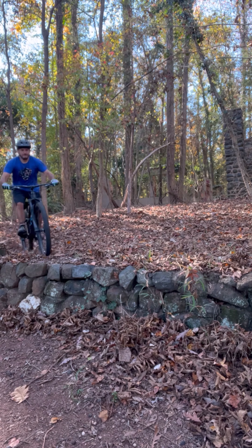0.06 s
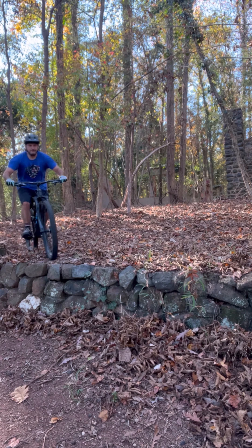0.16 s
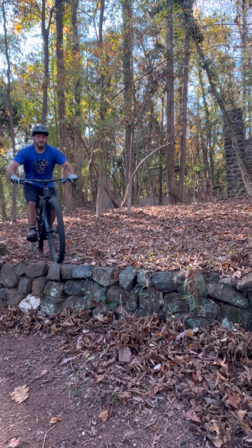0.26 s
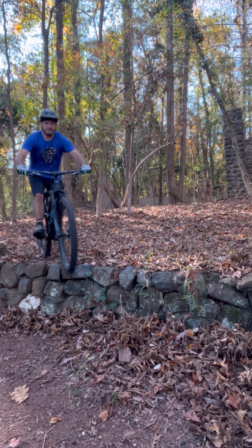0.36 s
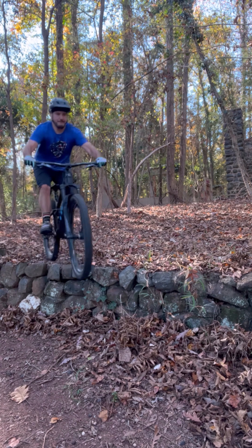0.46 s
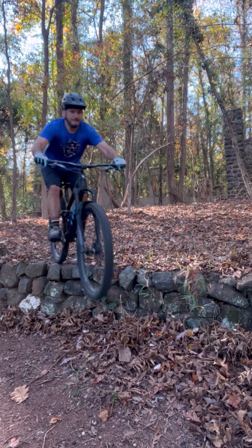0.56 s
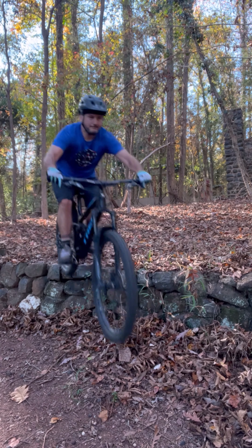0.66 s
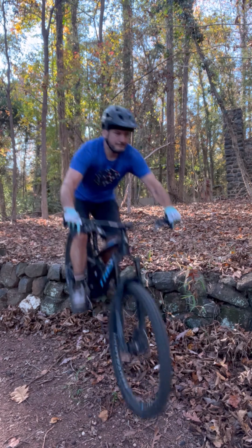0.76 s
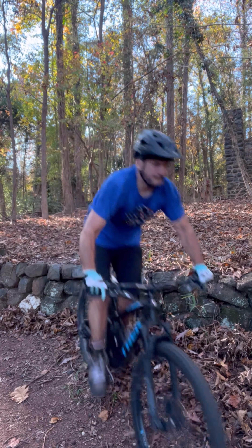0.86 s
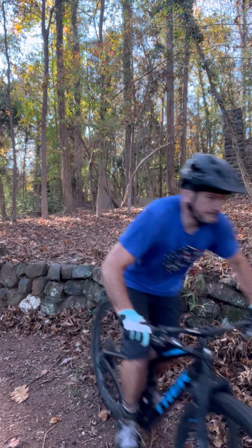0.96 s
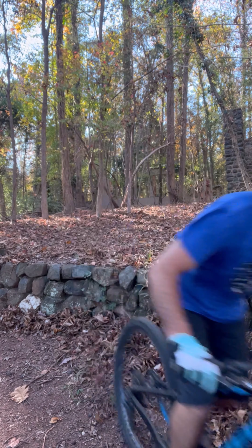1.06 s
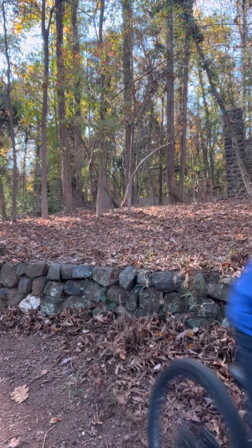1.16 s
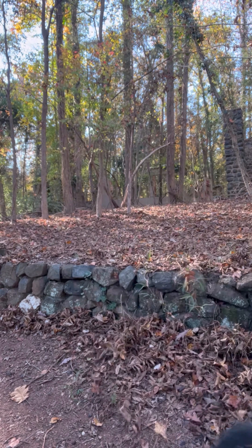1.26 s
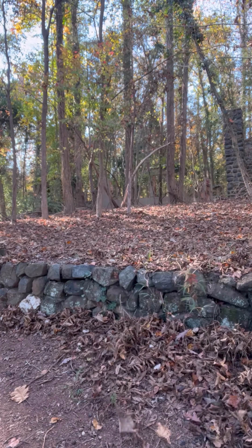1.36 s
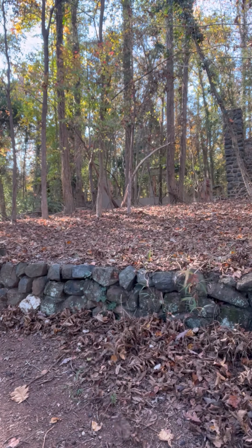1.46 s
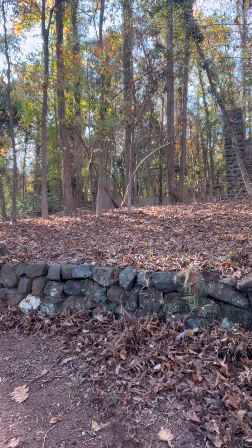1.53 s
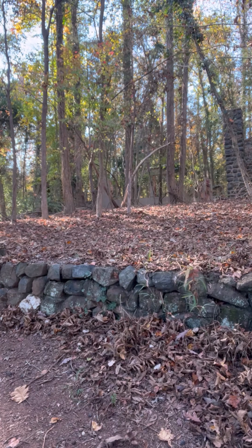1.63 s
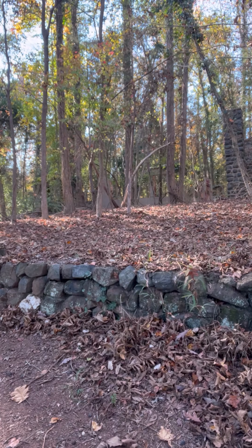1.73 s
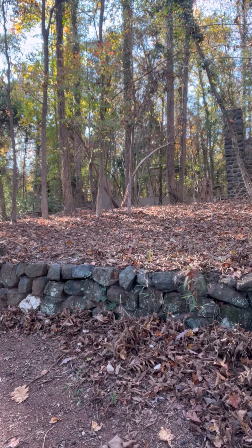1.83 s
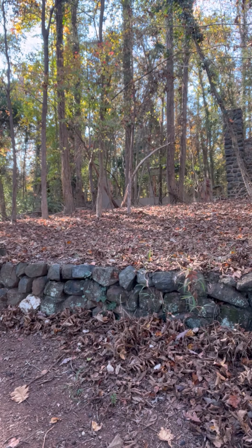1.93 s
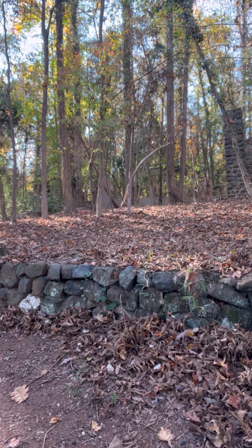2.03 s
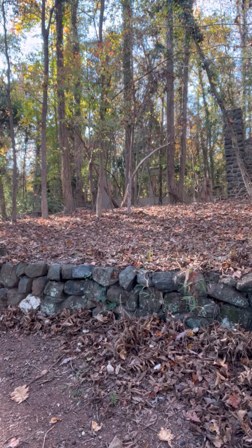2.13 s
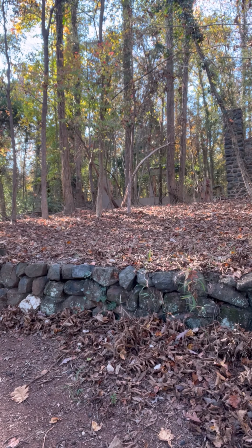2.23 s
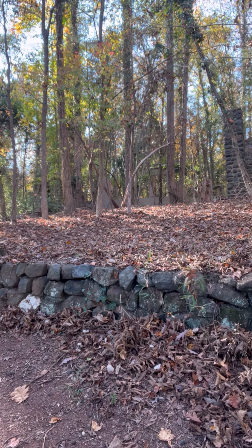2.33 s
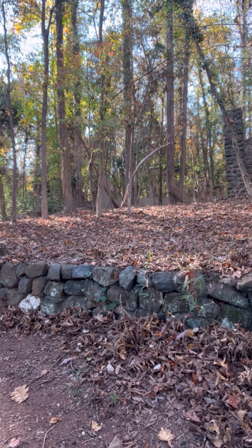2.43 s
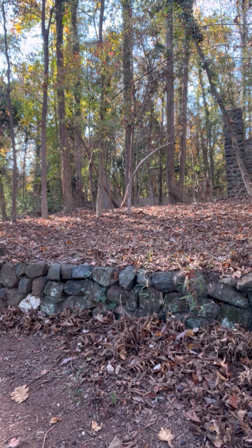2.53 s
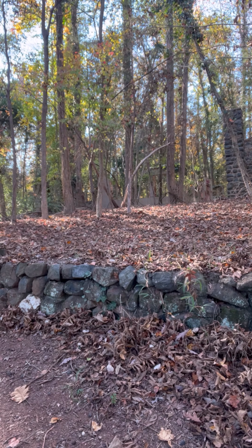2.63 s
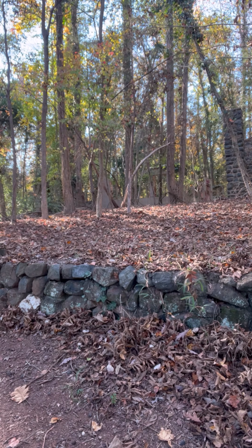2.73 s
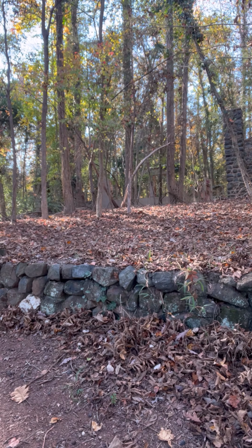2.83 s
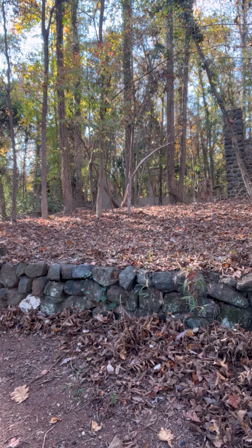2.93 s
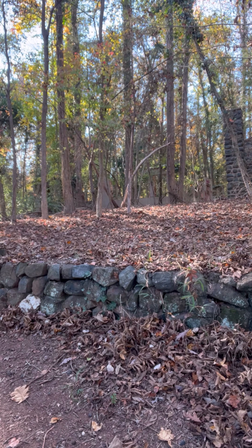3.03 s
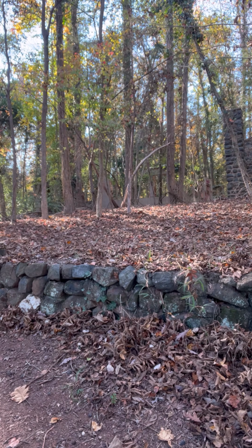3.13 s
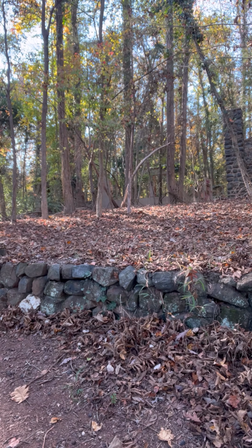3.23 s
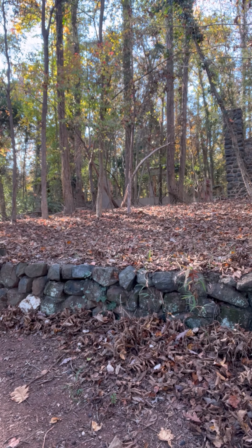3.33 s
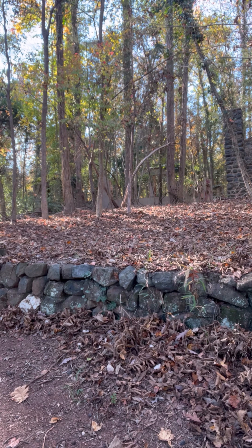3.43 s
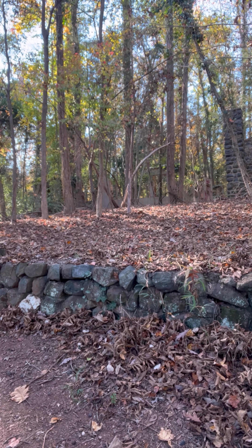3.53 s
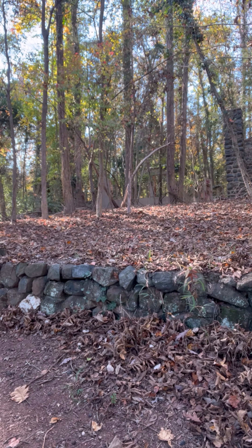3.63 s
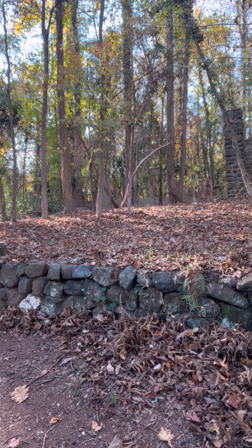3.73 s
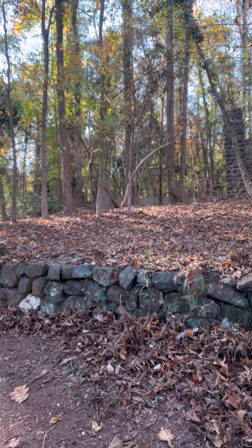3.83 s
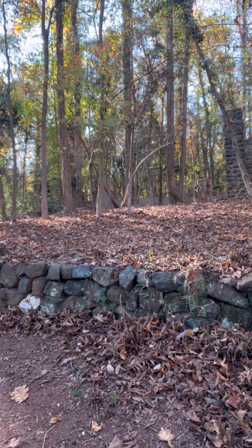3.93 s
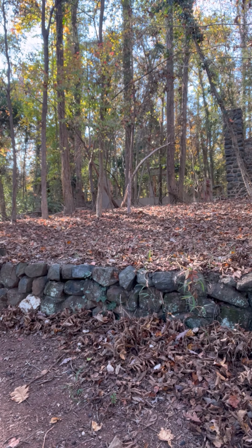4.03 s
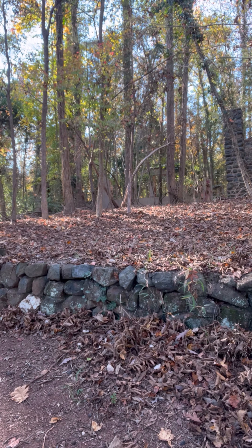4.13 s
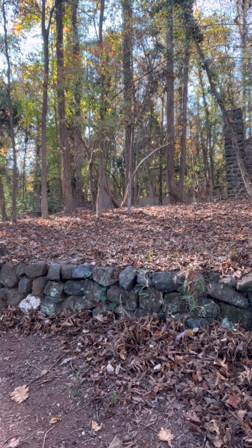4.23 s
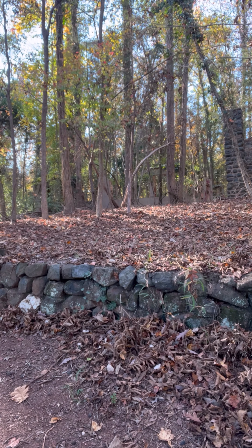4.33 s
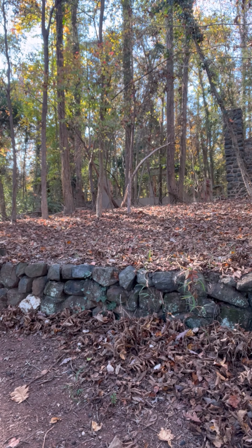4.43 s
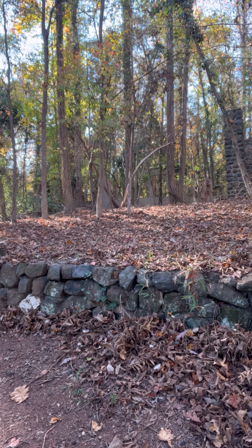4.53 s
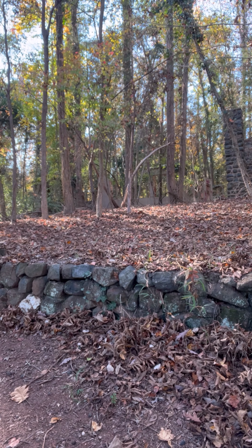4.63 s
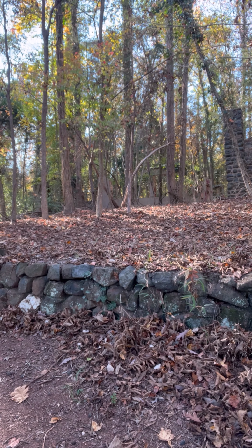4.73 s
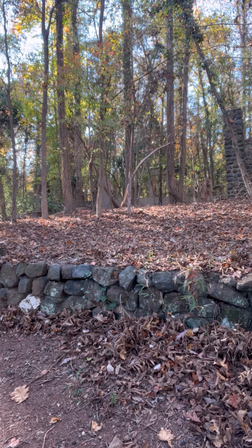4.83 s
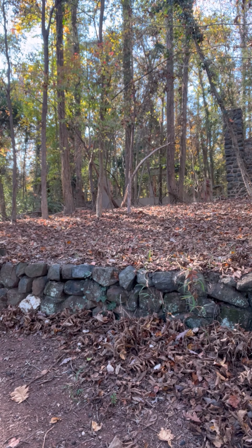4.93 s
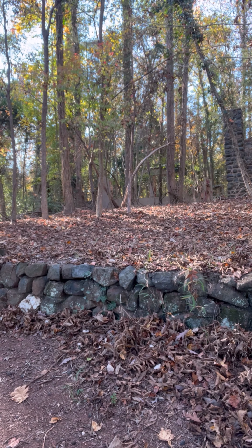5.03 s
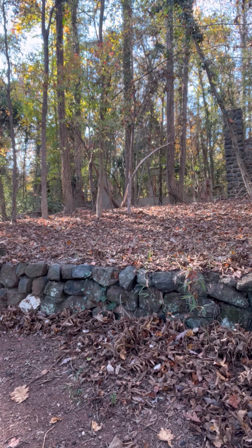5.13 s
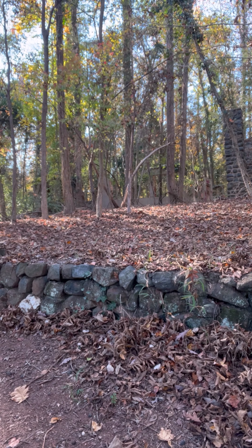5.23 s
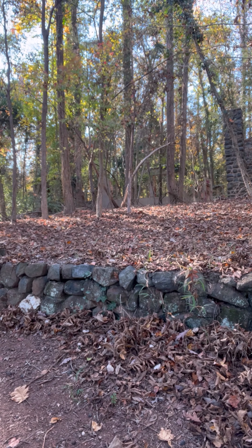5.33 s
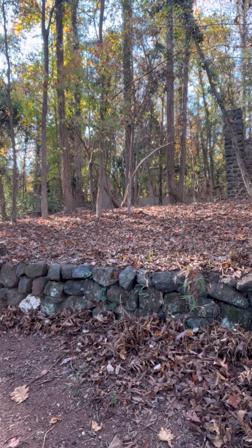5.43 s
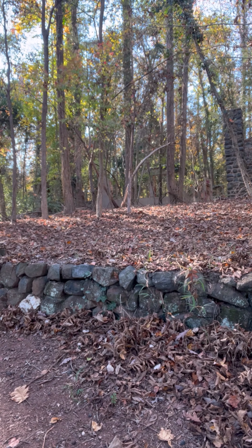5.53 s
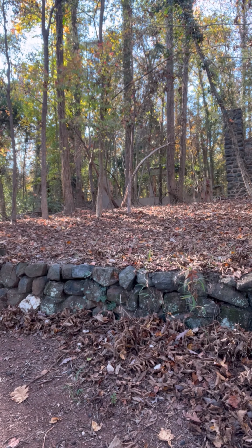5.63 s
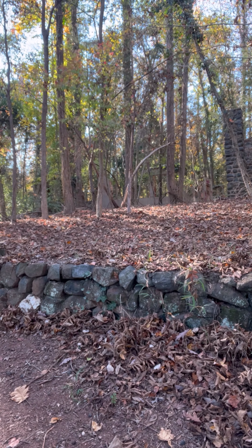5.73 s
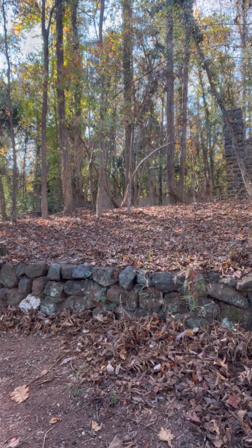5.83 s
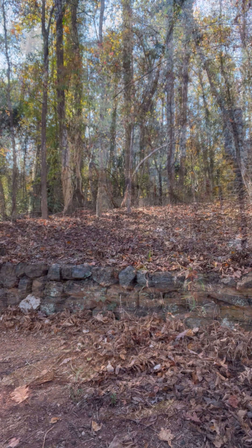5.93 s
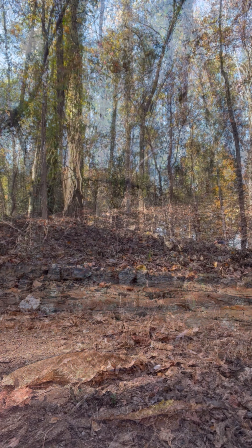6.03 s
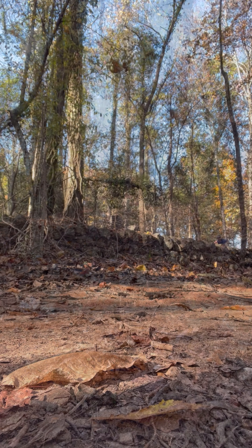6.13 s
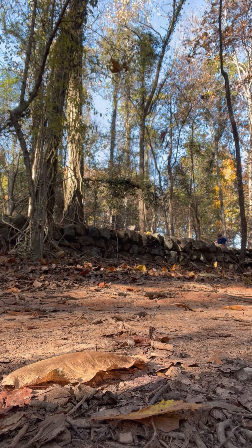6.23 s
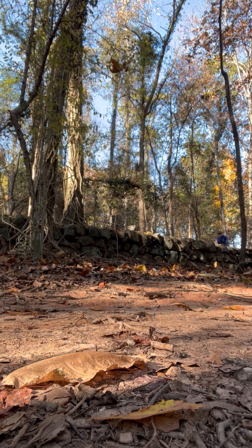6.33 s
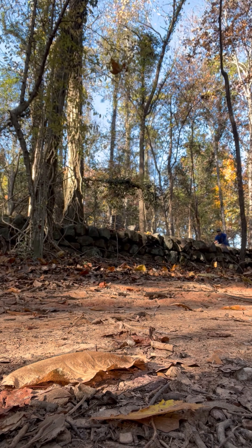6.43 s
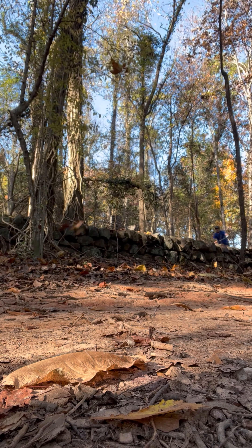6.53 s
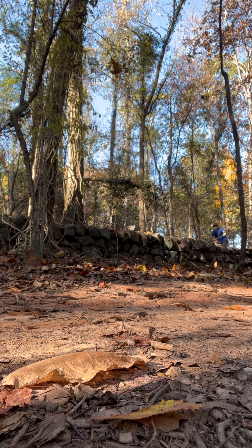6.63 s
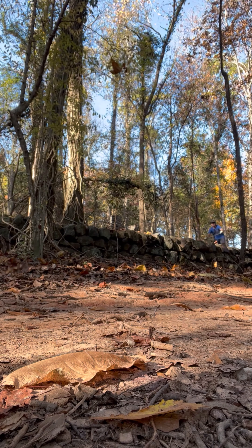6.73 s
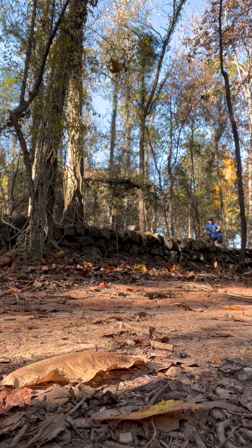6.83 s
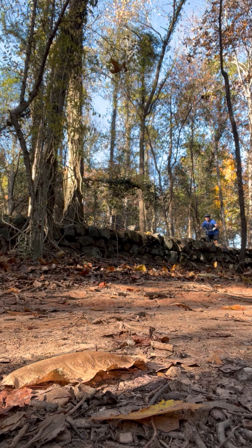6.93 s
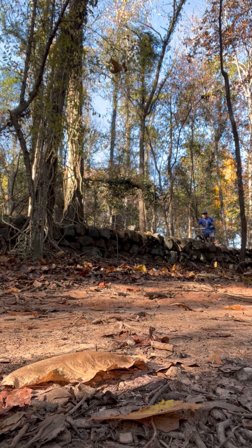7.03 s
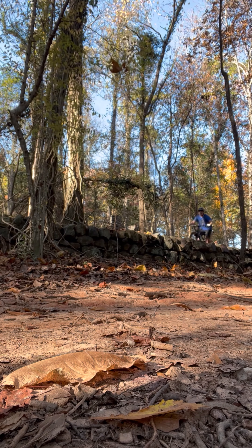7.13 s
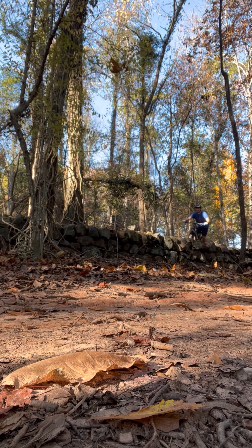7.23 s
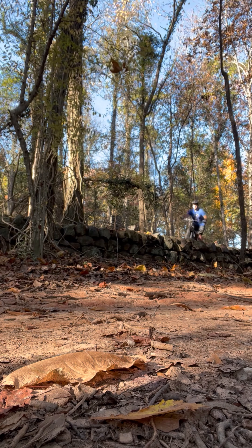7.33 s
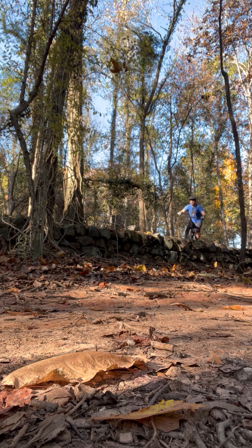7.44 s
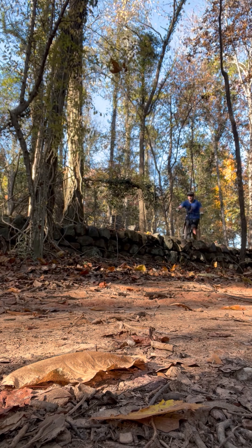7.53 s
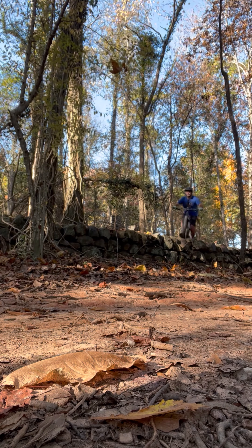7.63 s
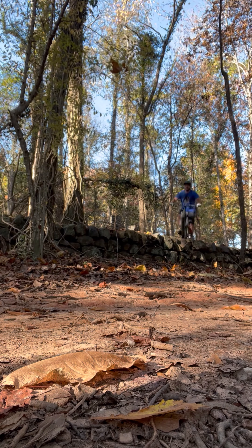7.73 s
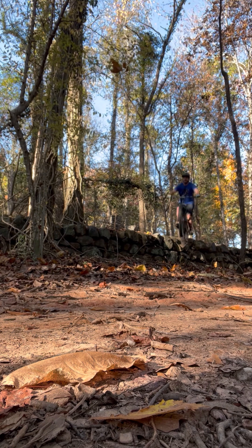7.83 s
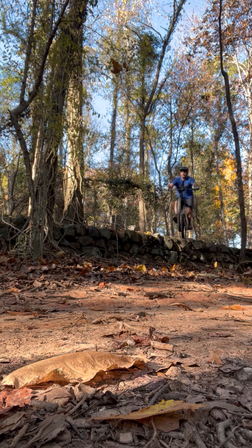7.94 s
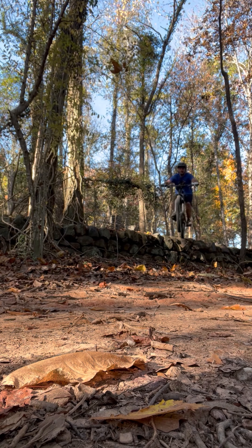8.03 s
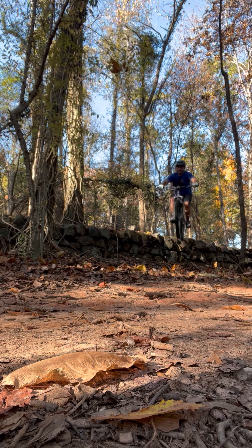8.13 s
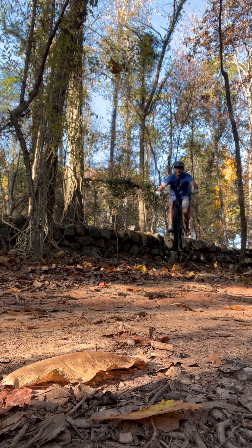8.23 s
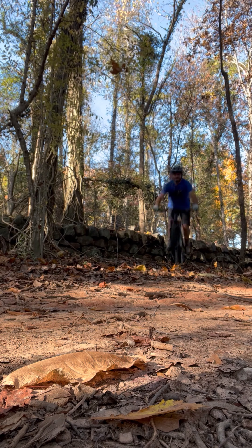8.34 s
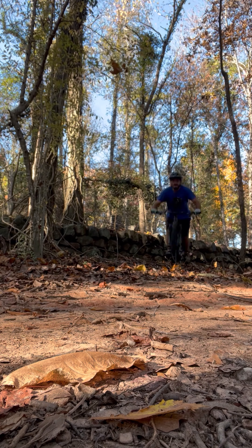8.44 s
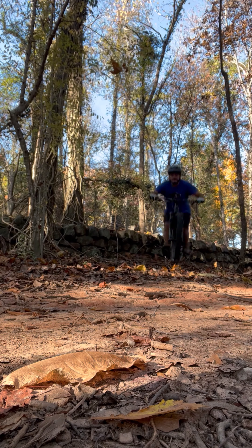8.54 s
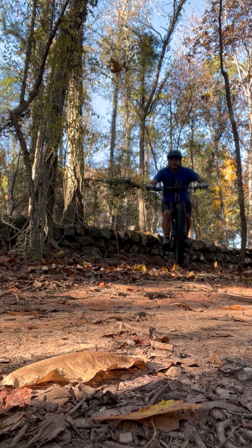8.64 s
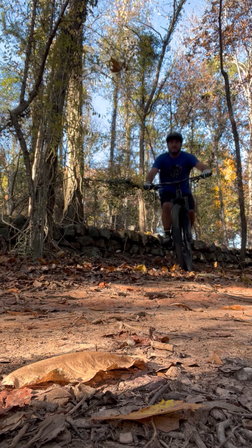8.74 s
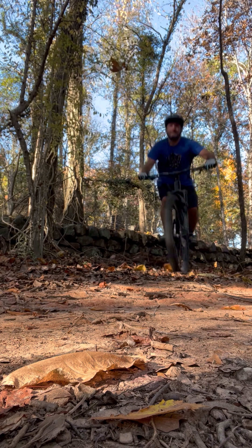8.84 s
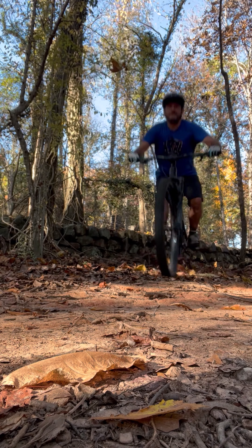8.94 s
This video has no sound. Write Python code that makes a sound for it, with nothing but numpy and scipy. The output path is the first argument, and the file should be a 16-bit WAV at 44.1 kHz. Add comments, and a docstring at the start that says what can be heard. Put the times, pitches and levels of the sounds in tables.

```python
"""In the woods, a mountain bike rolls over a leafy stone ledge, drops off it, lands close by and rides away.
A distant rumble swells, with an engine droning and birds peeping. The program then changes to a quieter spot,
where the bike comes from far off, bumps over the ground, lands and crunches towards a low pair of microphone openings.
Leaves, grit and tread are trains of tiny random clicks shaped in tone; thumps, knocks, rattles and peeps are
short sine waves, some with noise; the backgrounds are smooth coloured noise."""
import sys
import numpy as np
from scipy import signal
from scipy.fft import rfft, irfft, next_fast_len
from scipy.io import wavfile

SR = 44100
rng = np.random.default_rng(int(sys.argv[2]) if len(sys.argv) > 2 else 0)


def digitize_waveform(pressure):
    """Quantize a signal to 16-bit integers and store it at the path in sys.argv[1].

    Rows of a 2-D input are taken as channels; values are limited to [-1, 1].
    """
    field = np.atleast_2d(pressure).T
    bounded = np.clip(field, -1, 1)
    quanta = np.round(bounded * 32767).astype(np.int16)
    wavfile.write(sys.argv[1], SR, quanta)


N = 395577
T = np.arange(N) / SR  # time of every sample, seconds

# Tone colours, as relative level against pitch. Columns of each: pitch_hz, level_db (per Hz)
# dry leaves at the first spot and at the second
NEAR_LEAF_TONE = [(1200, -36.5), (3200, -2.5), (4200, -0.5), (5200, -4), (6500, 2), (8000, 1),
                  (10000, -3.5), (12000, -13.5), (14000, -10.5), (15700, -10.5)]
LOW_LEAF_TONE = [(900, -49), (2600, -2), (4000, -1), (5500, -0.5), (7500, 1.5), (10000, -2.5), (12000, -10),
                 (14000, -11.5), (15700, -7)]
# heaps of leaves and twigs being crushed
CRUSH_TONE = [(90, -44), (300, -3), (600, -2.5), (1000, -1), (1900, 0.5), (3000, -4), (4200, -5.5),
              (6000, -9), (9000, -9), (12000, -15.5), (15500, -19)]
# grit on the ledge, on the path ahead, on the path beside the microphone, and on packed dirt
LEDGE_GRIT_TONE = [(150, -25.5), (400, -4.5), (800, -8), (1300, -3), (1900, 0), (2500, -10), (3500, -18.5)]
PATH_GRIT_TONE = [(120, 3.5), (270, 1.5), (520, -0.5), (850, -7), (1300, -5.5), (2000, -0.5), (3200, -15)]
PATH_ASIDE_GRIT_TONE = [(120, 4), (270, 1.5), (420, 3), (600, 3), (850, -0.5), (1250, -6), (1650, -11),
                        (2000, -4), (3200, -14.5)]
DIRT_GRIT_TONE = [(200, -11), (450, 2), (700, -6), (1000, -2), (1500, -3), (2200, -9), (3500, -22)]
# tread knobs, the drumming frame, and the far bike on rough ground
KNOB_TONE = [(1500, -24), (1900, -9), (2250, -1.5), (2620, 0), (2850, -2.5), (3100, -22), (3400, -44)]
FRAME_TONE = [(80, -44), (140, -14), (190, 2), (260, -3), (350, -6), (700, -11), (1500, -33)]
ROUGH_GROUND_TONE = [(40, 0), (65, 2), (110, -5), (200, -4), (350, -25), (600, -34)]
# distant rumble, low air, foliage, the hush of the second spot, and the far engine
RUMBLE_TONE = [(60, -29.5), (100, -8), (125, -11.5), (150, 0), (175, -6), (205, -0.5), (250, -9.5),
               (330, -8), (500, -9), (750, -11.5), (1100, -16), (1500, -22.5), (2000, -22), (2400, -32.5),
               (3000, -40.5), (6000, -60.5)]
AIR_TONE = [(20, -25), (35, -10), (50, -6), (65, 3.5), (90, -8.5), (130, -19), (300, -39)]
FOLIAGE_TONE = [(1500, -4.5), (3000, 2.5), (5000, -3), (6500, 0), (9000, -7), (15000, -20)]
WOODS_TONE = [(25, -6), (55, 4.5), (90, 3), (135, -6.5), (220, -3.5), (400, -8), (700, -10.5), (1200, -15),
              (2200, -11), (4000, -13.5), (9000, -16.5), (14000, -29.5)]
ENGINE_TONE = [(108, -30.5), (128, 1.5), (143, -2.5), (160, -5), (185, -24.5)]

# How sound reaches the two microphone openings.
# Columns of each: pitch_hz, left_lead_radians, likeness (0 to 1), left_minus_right_db
# the first spot in general, close in front, beside, and the side the rumble comes from
UPRIGHT_MIC = [(20, -0.5, 0.89, 1.5), (150, 0.5, 1, -0.5), (590, -.5, 0.087, 3.5), (1280, -0.1, 0.47, 4.5),
               (2430, -2.5, 0.79, 4.5), (3260, 1.5, 0.24, 0.5), (5030, -1.9, 0.33, 0), (7150, 2.1, .7, 0),
               (9270, 3, 0.98, 0), (12010, 5, 0.43, 0), (13280, 5.5, .92, 0.5), (14900, 8, 0.62, 0.5),
               (15800, 6.5, 0.38, -3.5)]
AHEAD_MIC = [(20, 0.5, 0.7, 1.5), (150, 0, .85, 0.5), (590, -0.5, 1, 0), (1300, -0.8, .72, 1),
             (1900, -1.5, 0.39, 7), (2700, -2.5, 0.63, 2.5), (3530, 1.7, .45, -1), (5000, -1.5, 0.97, -0.5),
             (7120, 1.9, 0.79, 0), (9200, 3, 0.9, -.5), (13400, 5.5, 0.96, 0), (15800, 5.5, .5, -2)]
ASIDE_MIC = [(20, -2.5, 0.98, 1), (250, 0.1, 0.86, 5), (420, -1.4, 0.29, 1), (600, -2.5, 0.8, -2.5),
             (1200, -2.5, 0.65, 1.5), (1600, -3, .25, 5), (2000, -2.5, 0.58, 0.5), (2700, -5, 1, 3.5),
             (3200, -4, 0.45, -4.5)]
RUMBLE_MIC = [(20, 0, 0.98, 0), (150, 0.15, 0.98, 0.5), (247, 0.38, .75, 0.5), (386, 1.87, 0.35, 1.5),
              (596, 3, 0.48, 3.5), (850, 3.5, 0.55, 4), (1200, 4, 0.39, 3), (1600, 5, 0.94, 5),
              (2000, 4.5, 0.64, 8), (2590, 3.5, 0.53, 3), (5000, 4.5, .3, 0)]
# the second spot, lying low
GROUNDED_MIC = [(20, 1.5, 1, 0), (300, 0.45, 0.77, 0), (800, 0.8, 0.73, 0), (1410, 1.22, 0.9, 0),
                (2550, 2.35, 0.1, 0), (4100, -1, 0.13, 0), (7830, -3.5, 0.82, 0), (10300, -5.5, 0.35, 0),
                (15900, -9, 0.99, 0)]

# Leaves under the far-off bike. Columns: time_s, level_db, treble_db (before a steady lift)
FAR_LEAF_LEVEL = [(6.5, -82, -6), (6.64, -61, -9), (7.5, -58, -4.5), (7.72, -65.5, -2), (7.84, -57, -3.5),
                  (8.1, -57.5, -6), (8.2, -63.5, 0.5), (8.4, -60, 2.5)]
# Levels of the distant rumble, the low air at the first spot, and the far engine. Columns: time_s, level_db
RUMBLE_LEVEL = [(0, -46.5), (2, -45), (3, -48), (3.6, -49.5), (4.25, -44), (4.6, -46), (5.1, -42.5),
                (5.5, -42), (6.25, -43.5)]
AIR_LEVEL = [(0, -47.5), (1.3, -44), (2.2, -45.5), (3.4, -48), (4.6, -48), (5.8, -48), (6.2, -43.5)]
ENGINE_LEVEL = [(0, -54), (2.4, -59), (4.6, -52.5), (5, -43), (5.6, -48), (6.2, -40.5), (6.35, -55.5),
                (7, -68.5), (8.9, -70)]
# Leaves and twigs crushed under a wheel. Columns: start_s, level_db, decay_s, treble_tilt_db (per octave)
CRUSHED_HEAPS = [(.622, -42, 0.023, 2), (.899, -27.5, 0.016, -1.5), (0.913, -27, 0.013, 3),
                 (.922, -24.5, 0.019, 3), (.934, -21, 0.018, 3.5), (0.944, -23, .005, 0),
                 (0.955, -27.5, 0.0094, -5), (.969, -22.5, 0.014, 3), (.979, -31.5, 0.0056, -3),
                 (.988, -22.5, 0.0089, 4), (.999, -25.5, 0.018, 0), (1.018, -25.5, 0.012, 2),
                 (1.03, -33, 0.012, 0), (1.101, -39, 0.019, -14), (1.142, -31, 0.018, -7),
                 (1.188, -30.5, 0.013, -6), (1.538, -33, 0.011, -6.5), (1.549, -30, 0.0063, -8),
                 (1.558, -29.5, 0.0056, -10), (1.64, -55, .015, -1), (1.787, -40, 0.015, -18),
                 (1.88, -50, 0.037, 1), (2.405, -48.5, 0.048, 2), (2.715, -51, 0.037, -1),
                 (2.744, -48, 0.033, 1), (2.77, -47.5, 0.036, -0.5), (6.71, -42, 0.036, 4),
                 (6.751, -52.5, 0.061, 3), (7.802, -48.5, 0.0097, -5), (7.823, -52, .006, -4),
                 (7.832, -48, 0.0071, -4), (7.872, -49.5, 0.0093, -14), (7.885, -55, 0.03, -3),
                 (8.407, -42, 0.0064, -7), (8.425, -39, 0.014, 4.5), (8.553, -36, 0.021, -15),
                 (8.601, -38, 0.016, 8), (8.625, -44.5, 0.02, -8), (8.655, -43, .006, -8),
                 (8.714, -43.5, 0.017, -10), (8.815, -34, 0.02, -7), (8.82, -28, 0.018, 14.5),
                 (8.873, -43, 0.0063, -5), (8.912, -30, 0.0058, -4), (8.919, -21, 0.0054, 12),
                 (8.948, -34, 0.033, 0.5)]
# Dull low thumps, mostly of tyres on the ground, some perhaps air buffeting or handling of the microphone.
# Columns: start_s, level_db, pitch_hz
DULL_THUMPS = [(.91, -23, 75), (0.944, -13.5, 56.3), (0.97, -27, 103), (0.998, -22, 189), (1.026, -24, 152),
               (1.058, -28, 175), (1.095, -31, 150), (1.189, -36, 66.5), (1.255, -29, 64),
               (1.424, -41, 235), (1.431, -33, 94), (1.545, -27, 270), (1.878, -24.5, 64), (2.36, -38, 72),
               (4.214, -29, 66), (7.125, -44, 115), (7.239, -33, 56.5), (7.258, -44.5, 200),
               (7.302, -38, 109), (7.304, -48, 214), (7.347, -37, 74), (7.369, -31.5, 69.46),
               (7.368, -39, 193), (7.399, -46, 252), (7.403, -40, 141), (7.484, -36, 63.6),
               (7.511, -34, 96), (7.567, -35, 115), (7.572, -46, 250), (7.669, -45, 90), (7.701, -36.5, 71),
               (7.703, -47, 254), (7.779, -39.5, 119), (8.315, -38.5, 87), (8.368, -32, 70.4),
               (8.412, -37, 220), (8.43, -30, 264), (8.44, -36, 62), (8.472, -31, 194), (8.533, -28.5, 184),
               (8.543, -30, 182), (8.556, -27, 246), (8.606, -34, 198), (8.629, -39, 210),
               (8.714, -35, 272), (8.757, -33, 111), (8.772, -39, 70), (8.845, -35, 136),
               (8.866, -31.5, 84.6)]
# Sharp knocks of the bike and of stones under its tyres. Columns: start_s, level_db, pitch_hz, decay_s
SHARP_KNOCKS = [(.272, -14, 1330, 0.00079), (0.899, -19, 1360, 0.003), (.906, -17, 335, 0.003),
                (.906, -19, 1040, 0.0023), (.915, -21, 5440, .003), (.9405, -14, 3200, 0.00036),
                (0.989, -20.5, 382, 0.0044), (1.018, -23, 920, 0.0042), (1.025, -19.5, 643, 0.0026),
                (1.031, -19, 1100, 0.00081), (1.074, -27.5, 1204, 0.0065), (1.115, -29, 1120, 0.016),
                (1.138, -28, 614, 0.0081), (1.19, -25.5, 1980, .009), (1.194, -23, 1330, 0.021),
                (1.241, -28, 525, 0.01), (1.531, -28, 497, .008), (1.549, -37, 1110, 0.0012),
                (1.558, -26, 414, 0.0032), (1.383, -28, 2634, 0.013), (1.779, -37.5, 896, 0.012),
                (1.79, -35, 690, 0.0069), (1.835, -38, 2610, .012), (2.675, -45, 2850, .008),
                (8.409, -34, 590, 0.0027), (8.558, -24, 495, 0.0034), (8.797, -34, 500, .004),
                (8.817, -28, 1024, 0.0065), (8.872, -32, 480, 0.0026), (8.826, -26.5, 530, 0.01),
                (8.894, -22.5, 415, 0.0027)]
# Metal parts that ring, before each jolt varies them. Columns: pitch_hz, level_db, fall_by_60_db_s
METAL_PARTS = [(1190, -5.5, .2), (1330, -5.5, 0.18), (1474, -7.5, .2), (1840, 2, 0.25), (1895, -4.5, 0.24),
               (2850, -10, 0.13), (3440, -12.5, 0.08), (3800, -10, .15), (5280, -4.5, .08),
               (5230, -1.5, 0.089), (5760, 1.5, 0.13), (6430, -2.5, 0.15), (7040, -6, 0.13)]
# Jolts that rattle the metal. Columns: start_s, level_db
RATTLE_JOLTS = [(.108, -45), (0.359, -44), (0.916, -29), (0.938, -32.5), (0.988, -36.5), (1.022, -33.5),
                (1.071, -37), (1.196, -42), (1.548, -52)]
# Faint bird peeps. Columns: start_s, peak_db, middle_pitch_hz, length_s, glide (share of the pitch)
BIRD_PEEPS = [(3.522, -61, 3550, 0.029, .12), (4.003, -70, 5620, 0.024, -.06),
              (4.055, -68, 5000, 0.038, -.02), (4.074, -62, 3220, 0.016, .14),
              (4.132, -65, 3980, .025, -.05), (4.697, -67, 3700, .024, .13)]
# Tread pitch over time, before a random waver. Columns: time_s, pitch_factor
TREAD_PITCH = [(1.06, 0.88), (1.2, 0.88), (1.27, 0.95), (1.4, 0.96), (1.5, 0.92), (1.64, 1.016),
               (2.4, 0.99), (3, 0.9), (3.8, 0.76)]
# Hollow note of the passing tyres. Columns: time_s, pitch_hz
HOLLOW_PITCH = [(1.2, 570), (1.29, 515), (1.37, 400), (1.48, 406), (1.53, 459.5), (1.57, 290)]
# Smooth swells of the leaf and tread sound: some under tyre load, some slow and faint as the bike recedes.
# Columns: middle_s, level_db, half_width_s
SMOOTH_SWELLS = [(.14, -41, 0.063), (.41, -40, 0.049), (1.41, -42, 0.12), (2.5, -61, 0.35),
                 (3.12, -65.5, 0.31), (3.83, -71.5, 0.073), (4.15, -77, 0.16), (8.455, -48.5, 0.058),
                 (8.571, -43.5, 0.071), (8.88, -40.5, 0.029)]

# The second spot fades in before the first fades out
SECOND_IN_S, FIRST_OUT_S = 5.77, 6.27
# First pass: the wheels leave the ledge, touch down and roll on along the path
TAKEOFF_S, TOUCHDOWN_S, ROLL_ON_S, GONE_S = .49, .9, 1.03, 4.5
LEDGE_DB, FLIGHT_DB, FLIGHT_DB_PER_S = -48, -58, 12  # the hiss grows as the flying bike comes closer
PASS_S, PASS_M, SPEED_M_PER_S = 1.32, 0.87, 4.78  # moment and distance of the closest point; riding speed
BRUSH_DB_PER_M = 0.88  # undergrowth swallows the crackle with distance
SETTLE_S = 0.15  # the extra tyre load of the landing dies away
SPRAY_S = (1.41, 1.53)  # the rear tyre flings bright leaf scraps towards the microphone
SWING_S, SWING_LENGTH_S = 1.56, 0.16  # the bike swings from in front of the microphone to beside it
# Second pass: rough ground far off, then the landing and the run towards the microphone
BUMPY_S, BUMPY_DB = (7.25, 7.76), -58
LANDING_S, ARRIVAL_S, ARRIVAL_M = 8.418, 8.96, 0.53
REBOUND_S, REBOUND_DB = (8.67, 8.78), -2  # the suspension springs back and unloads the tyres
# How the single sounds behave
CRUNCH_RISE_SHARE = 0.24  # rise time as a share of decay, so a longer crunch swells more slowly
THUMP_DECAY_S, THUMP_HZ, THUMP_RISE_CYCLES = 0.02, 69.5, .2  # decay at this pitch; higher thumps die sooner
DETUNE, STRIKE_DB = .02, 5.5  # each jolt varies the metal parts by up to this share of pitch and this level
PEBBLE_HZ, PEBBLE_CYCLES = (384, 2410), 3.5  # lowest and highest pitch; cycles in which a ring decays
PEBBLES_PER_S, PEBBLE_SPREAD_DB = 110, 3
WHIRR_WAVER, RUSTLE_DB = .02, 1.8  # uneven pitch (as a share) and uneven level of the tread
HOLLOW_WIDTH_HZ = 150
CHIRP_ECHO = 0.99  # scatter among the trunks, against the direct peep
TREBLE_EDGE_HZ = 15900


def amp(db):
    """Turns decibels into gain."""
    return 10 ** (np.asarray(db) / 20)


def rms(x):
    """Average strength (root mean square)."""
    return np.sqrt(np.mean(x ** 2) + 1e-20)


def read(points, hz, axis=1):
    """Reads one column of a table between its pitches, on a log-pitch axis."""
    table = np.array(points, float)
    return np.interp(np.log(hz + 1), np.log(table[:, 0] + 1), table[:, axis])


def level(rows, fade=0.1, lead=0.016):
    """Gain over time from a level table, fading in before the first row and out after the last."""
    table = np.array(rows)
    before = np.maximum(table[0, 0] - T, 0) / lead
    after = np.maximum(T - table[-1, 0], 0) / fade
    return amp(np.interp(T, table[:, 0], table[:, 1])) * np.exp(-(before + after) ** 2)


def during(start, end, rise=0.015, fall=0.014):
    """Gain of one between two times, fading in before and out after."""
    outside = np.maximum(start - T, 0) / rise + np.maximum(T - end, 0) / fall
    return np.exp(-outside ** 2)


def wander(rate, size=2048, count=N):
    """Slow random drift of unit strength, with little motion faster than rate in Hz."""
    hz = np.fft.rfftfreq(size, N / SR / size)
    x = irfft(rfft(rng.standard_normal(size)) / (1 + (hz / rate) ** 4), size)
    return np.interp(T[:count], np.linspace(0, N / SR, size), x / rms(x))


def distance(closest_s, closest_m):
    """Metres to a bike that rides a straight line past the microphone."""
    return np.hypot(closest_m, SPEED_M_PER_S * (T - closest_s))


def swells():
    """Gain of the smooth swells of leaf and tread sound."""
    return sum(amp(db) * np.exp(-((T - s) / width) ** 2) for s, db, width in SMOOTH_SWELLS)


def grains(per_s, spread_db, bed, size=N):
    """Two trains of tiny fractures, most small and a few large, over a bed too dense to tell apart."""
    chance = rng.random((2, size)) * SR / per_s
    hiss = rng.standard_normal((2, size))
    snaps = chance < 1
    clicks = np.zeros((2, size))
    snap_db = spread_db * np.minimum(-np.log(chance[snaps]), 4)
    clicks[snaps] = np.sign(hiss[snaps]) * amp(snap_db)
    return clicks / rms(clicks) + bed * rng.standard_normal((2, size))


def reflections(hz, strength, count=12):
    """Stones and bike parts return weak, late copies of the short waves, rippling the spectrum."""
    taps = np.zeros(2 * (len(hz) - 1))
    delays = (rng.uniform(.002, .012, count) * SR).astype(int)
    np.add.at(taps, delays, rng.choice([-1, 1], count) * strength / np.sqrt(count))
    return 1 + rfft(taps) * hz / (hz + 600)


def ports(pair, spectrum, mic, tilt_db=0, band=(0, SR), echo=0.35):
    """Colours two unrelated signals and blends them into two openings; their mean has unit level in the band."""
    n = 2 * next_fast_len(pair.shape[1] // 2 + 1)
    hz = np.fft.rfftfreq(n, 1 / SR)
    a, b = rfft(pair, n)
    phase = read(mic, hz, axis=1)
    same = np.clip(read(mic, hz, axis=2), 0, 1)
    side_db = read(mic, hz, axis=3)
    right = (same * a + np.sqrt(1 - same ** 2) * b) * np.exp(-1j * phase)
    z = np.array([a * amp(side_db / 2), right * amp(-side_db / 2)]) * reflections(hz, echo)
    # the tone rolls off past both ends of its table
    beyond = np.maximum(hz / spectrum[-1][0], 1) * np.maximum(spectrum[0][0] / (hz + 1), 1)
    z *= amp(read(spectrum, hz) + tilt_db * np.log2(hz / 1000 + 1)) / beyond ** 2
    in_band = z[:, (hz > band[0]) & (hz < band[1])].mean(0)
    return irfft(z, n)[:, :pair.shape[1]] * n / np.sqrt(2 * np.sum(abs(in_band) ** 2))


def add(mix, s, sound):
    """Mixes a sound in at a time in seconds."""
    part = mix[:, max(round(s * SR), 0):][:, :sound.shape[-1]]
    part += sound[..., :part.shape[1]]


def distant(spectrum, mic, db):
    """A far, diffuse sound: smooth noise without near reflections."""
    return amp(db) * ports(rng.standard_normal((2, N)), spectrum, mic, echo=0)


def background():
    """Distant rumble, low air and faint foliage give way to the second spot's hush; a far engine drones."""
    first = np.clip((FIRST_OUT_S - T) / 0.013 + .5, 0, 1)
    second = np.clip((T - SECOND_IN_S) / 0.012, 0, 1)
    rumble = level(RUMBLE_LEVEL) * distant(RUMBLE_TONE, RUMBLE_MIC, db=.7 * wander(7))
    air = level(AIR_LEVEL, fade=1) * distant(AIR_TONE, UPRIGHT_MIC, db=wander(6))
    foliage = distant(FOLIAGE_TONE, UPRIGHT_MIC, db=-77.5 + .7 * wander(4.5))
    woods = distant(WOODS_TONE, GROUNDED_MIC, db=-53.0 + .5 * wander(2.5))
    engine = level(ENGINE_LEVEL) * distant(ENGINE_TONE, UPRIGHT_MIC, db=-1.3)
    return first * (rumble + air + foliage) + second * woods + engine


def leaves(gain, spectrum, mic, per_s, spread_db, bed, clump_db, db, top_db):
    """Dry leaves snap in clumps under the tyres; top_db sets the treble above 10 kHz."""
    snaps = grains(per_s, spread_db, bed) * amp(clump_db * wander(70))
    sound = ports(snaps, spectrum, mic, band=(3200, 8500))
    top = signal.sosfiltfilt(signal.butter(3, 10000, "high", fs=SR, output="sos"), sound)
    return amp(db) * gain * (sound - top + amp(top_db) / rms(top.mean(0)) * top)


def tyres(gain, spectrum, mic, per_s, spread_db, db, clump_db):
    """Grit and small stones grind under the tread, in uneven patches."""
    grit = ports(grains(per_s, spread_db, bed=0.72), spectrum, mic, band=(500, 2200), echo=0.54)
    return amp(db + clump_db * wander(25)) * gain * grit


def over_ledge():
    """Tyres crackle over the leafy ledge, then a thinner, brighter hiss sounds during the flight."""
    rolling = during(0, TAKEOFF_S - .03, fall=0.048)
    flying = during(TAKEOFF_S + 0.045, TOUCHDOWN_S, rise=0.042)
    flight = flying * amp(FLIGHT_DB + FLIGHT_DB_PER_S * np.minimum(T - TAKEOFF_S, 1))
    gain = np.hypot(amp(LEDGE_DB) * rolling + flight, swells() * (T < TOUCHDOWN_S))
    crackle = leaves(gain, NEAR_LEAF_TONE, UPRIGHT_MIC, per_s=2500, spread_db=1.5, bed=0.89,
                     clump_db=1.0, db=0.5, top_db=-1.5 + 7.2 * flying)
    grit = tyres(gain, LEDGE_GRIT_TONE, UPRIGHT_MIC, per_s=1200, spread_db=2, db=3.0, clump_db=0.3)
    return crackle + grit


def rattle(size=16384):
    """Each jolt sets off a short chatter of contacts that ring the metal parts."""
    out, t = np.zeros((2, N)), np.arange(size) / SR
    for s, db in RATTLE_JOLTS:
        contacts = rng.random(size) < 500 / SR
        chatter = rng.standard_normal(size) * contacts * np.exp(-t / 0.016)
        chatter[0] = 1
        ring = np.zeros((2, size))
        for hz, mode_db, t60 in METAL_PARTS:
            detune, strike = rng.uniform(-1, 1, 2)
            turns = hz * (1 + DETUNE * detune) * t + rng.random((2, 1))
            ring += amp(mode_db + STRIKE_DB * strike - 60 * t / t60) * np.sin(2 * np.pi * turns)
        add(out, s, amp(db) * signal.fftconvolve(ring, chatter[None] / np.linalg.norm(chatter)))
    return out


def blows(size=16384):
    """Each dull thump is a few low cycles with a soft noisy scuff; bike parts and stones give short knocks."""
    out, t = np.zeros((2, N)), np.arange(size) / SR
    for s, db, hz in DULL_THUMPS:
        around_pitch = signal.butter(2, [.9 * hz, 2.5 * hz], "band", fs=SR, output="sos")
        scuff = signal.sosfilt(around_pitch, rng.standard_normal(size))
        push = -np.sin(2 * np.pi * hz * t) + 0.3 * scuff / rms(scuff)
        rise = 1 - np.exp(-t * hz / THUMP_RISE_CYCLES)
        fall = np.exp(-t / THUMP_DECAY_S * (hz / THUMP_HZ) ** 0.5)
        add(out, s, amp(db) * push * rise * fall)
    for s, db, hz, decay in SHARP_KNOCKS:
        knock = amp(db) * np.sin(2 * np.pi * hz * t) * t / decay * np.exp(1 - t / decay * 2.0)
        add(out, s, knock * amp([[1.5], [-1.5]]))  # a little louder on the left
        add(out, s + .0033, 0.23 * knock)  # reflection from the ground
    return out


def crunches(size=10240):
    """A wheel crushes a heap of leaves: a quick swell of fractures that thins out in clumps."""
    out, t = np.zeros((2, N)), np.arange(size) / SR
    for s, db, decay, tilt_db in CRUSHED_HEAPS:
        snaps = grains(4000, 2.3, bed=.4, size=size) * amp(1.2 * wander(120, count=size))
        mic = AHEAD_MIC if s < SECOND_IN_S else GROUNDED_MIC
        burst = ports(snaps, CRUSH_TONE, mic, tilt_db)
        rise = CRUNCH_RISE_SHARE * decay
        shape = np.minimum(t / rise, 1) * np.exp(-np.maximum(t - rise, 0) / decay)
        add(out, s, amp(db) * burst * shape)
    return out


def pebbles(gain, db, tilt_db=-3.0, size=2048):
    """Loose stones pop from under the tread, each with a short ring at its own pitch."""
    out, t = np.zeros((2, N)), np.arange(size) / SR
    low, high = PEBBLE_HZ
    ride_s = GONE_S - ROLL_ON_S
    for when, pitch, bulk, side in rng.random((round(PEBBLES_PER_S * ride_s), 4)):
        s, hz = ROLL_ON_S + when * ride_s, low * (high / low) ** pitch
        lag = np.array([[0], [side * .0004]])  # the right side hears it slightly later, in seconds
        ring = np.sin(2 * np.pi * hz * (t - lag))
        ring *= np.exp(-t * hz / PEBBLE_CYCLES) * (1 - np.exp(-2 * t * hz))
        pop_db = db + tilt_db * np.log2(hz / low) + PEBBLE_SPREAD_DB * min(-np.log(bulk), 2)
        add(out, s, gain[round(s * SR)] * amp(pop_db) * ring)
    return out


def resonate(x, hz, width_hz):
    """A resonance that follows a pitch curve."""
    turn = np.exp(2j * np.pi * np.cumsum(hz) / SR)
    r = np.exp(-np.pi * width_hz / SR)
    # shift the pitch down to zero, smooth, and shift it back up
    return (turn * signal.lfilter([(1 - r) ** 2], [1, -2 * r, r * r], x / turn)).real


def hollow(gain, db):
    """Grit drums on the tyre casings: a hollow note, mostly sinking, as the bike passes."""
    pitch = np.interp(T, *np.transpose(HOLLOW_PITCH))
    note = resonate(grains(250, 4.1, bed=0.35)[0], pitch, HOLLOW_WIDTH_HZ)
    return amp(db) * gain * during(HOLLOW_PITCH[0][0], HOLLOW_PITCH[-1][0]) * note / rms(note)


def whirr(gain, mic, db):
    """The tread's uneven rustle rises as the bike pulls away, wavers, and then sinks in pitch."""
    buzz = ports(grains(260, 1.9, bed=0.31), KNOB_TONE, mic)
    speed = np.interp(T, *np.transpose(TREAD_PITCH)) * (1 + WHIRR_WAVER * wander(9))
    place = np.cumsum(speed) / SR  # stepping through the buzz faster raises its pitch
    return amp(db + RUSTLE_DB * wander(18)) * gain * np.array([np.interp(place, T, side) for side in buzz])


def ride_away():
    """Leaves, grit and tread fade with distance along the path; the landing still loads the tyres at first."""
    metres = distance(PASS_S, PASS_M)
    rolling = during(ROLL_ON_S, GONE_S, fall=0.067)
    load = np.exp(-np.maximum(T - ROLL_ON_S, 0) / SETTLE_S)
    fading = amp(-43.0 - BRUSH_DB_PER_M * metres) / metres
    crush = rolling * np.sqrt(fading ** 2 + (amp(-39.0) * load) ** 2 + swells() ** 2)
    spray = during(*SPRAY_S, rise=0.27, fall=0.17)
    crackle = leaves(crush, NEAR_LEAF_TONE, UPRIGHT_MIC, per_s=4200, spread_db=2.5, bed=1.0,
                     clump_db=0.7, db=-1.0, top_db=0.6 + 7.1 * spray)
    swung = (1 + np.tanh((T - SWING_S) / SWING_LENGTH_S)) / 2
    ahead, aside = np.sqrt(1 - swung), np.sqrt(swung)
    grind = rolling * (amp(-10.5) / metres ** 0.84 + load)
    grit = tyres(grind * ahead, PATH_GRIT_TONE, AHEAD_MIC, per_s=330, spread_db=2.0, db=-37, clump_db=-0.3)
    grit += tyres(grind * aside, PATH_ASIDE_GRIT_TONE, ASIDE_MIC, per_s=300, spread_db=3.0, db=-37.0,
                  clump_db=2.0)
    grit += pebbles(grind, db=-33.5) + hollow(rolling / metres, db=-43.5)
    tread = rolling * (amp(-.55 * metres) / metres + amp(34.5) * swells())
    whirring = whirr(tread * ahead, AHEAD_MIC, db=-43.5) + whirr(tread * aside, ASIDE_MIC, db=-42.5)
    return crackle + grit + whirring


def birds(size=8192):
    """Short gliding peeps, trailed by scattering among the trunks."""
    out = np.zeros((2, N))
    for s, db, hz, length, glide in BIRD_PEEPS:
        u = np.arange(0, 1, 1 / (length * SR))  # runs from 0 to 1 over the peep
        pitch = hz * (1 + glide * (u - .5))
        peep = amp(db) * np.sin(np.pi * u) ** 2 * np.sin(2 * np.pi * np.cumsum(pitch) / SR)
        trunks = rng.standard_normal((2, size)) * np.exp(-np.arange(size) / SR / 0.046)
        add(out, s, peep)
        add(out, s, CHIRP_ECHO * signal.fftconvolve(peep[None], trunks / np.linalg.norm(trunks[0])))
    return out


def second_pass():
    """A far hiss of leaves, then the landing and the run to the microphone; the frame drums under load."""
    far_gain = level(FAR_LEAF_LEVEL)
    far_top_db = np.interp(T, *np.transpose(FAR_LEAF_LEVEL)[::2])
    far = leaves(far_gain, LOW_LEAF_TONE, GROUNDED_MIC, per_s=7100, spread_db=3.0, bed=0.83,
                 clump_db=1.7, db=-2, top_db=far_top_db + 4.0)
    bumpy = during(*BUMPY_S, rise=0.082, fall=0.37)
    far += tyres(far_gain * bumpy, LEDGE_GRIT_TONE, GROUNDED_MIC, per_s=90, spread_db=4.0, db=-8.5, clump_db=3.0)
    landed, swell = during(LANDING_S, T[-1]), swells()
    approach = amp(-44.5) / distance(ARRIVAL_S, ARRIVAL_M)
    gain = landed * np.hypot(approach, swell) * amp(REBOUND_DB * during(*REBOUND_S))
    near = leaves(gain, LOW_LEAF_TONE, GROUNDED_MIC, per_s=3100, spread_db=2.5, bed=0.77,
                  clump_db=1.3, db=0.0, top_db=1.0)
    near += tyres(gain, DIRT_GRIT_TONE, GROUNDED_MIC, per_s=450, spread_db=1.5, db=-0.5, clump_db=0.2)
    drumming = landed * (amp(-47.0) + amp(1.0) * swell * during(LANDING_S, 8.62, fall=0.034))
    return far + near + drumming * ports(grains(400, 1.3, bed=0.49), FRAME_TONE, GROUNDED_MIC)


def rough_ground():
    """The far tyres rumble unevenly over roots and stones."""
    rumble = distant(ROUGH_GROUND_TONE, GROUNDED_MIC, db=BUMPY_DB + 3.6 * wander(17))
    return during(*BUMPY_S, rise=0.022, fall=0.057) * rumble


def scene():
    """Both passes with their thumps, knocks and rattles, in the woods."""
    first_pass = over_ledge() + ride_away()
    short_sounds = rattle() + blows() + crunches()
    return background() + first_pass + short_sounds + birds() + second_pass() + rough_ground()


def record(dry, low_cut_hz=27):
    """The recorder cuts the deepest bass and the topmost treble."""
    cut = signal.sosfilt(signal.butter(2, low_cut_hz, "high", fs=SR, output="sos"), dry)
    treble_limit = signal.firwin(511, TREBLE_EDGE_HZ, window=("kaiser", 9), fs=SR)
    return signal.oaconvolve(cut, treble_limit[None], "same")


dry = scene()
out = record(dry)
digitize_waveform(out)
```